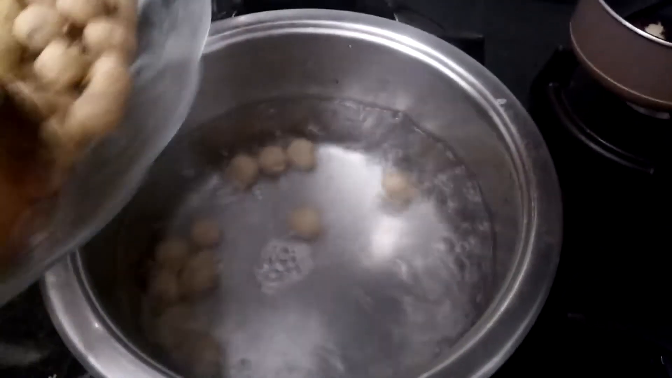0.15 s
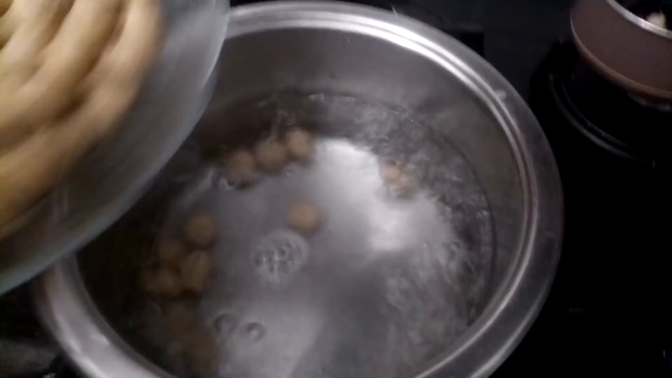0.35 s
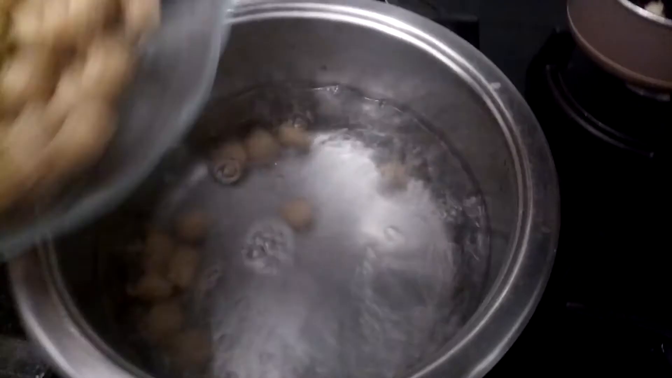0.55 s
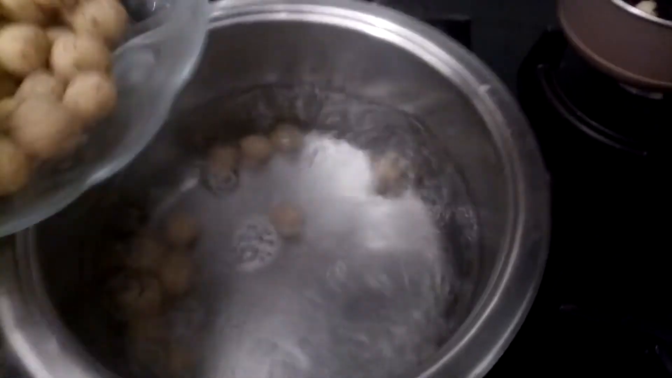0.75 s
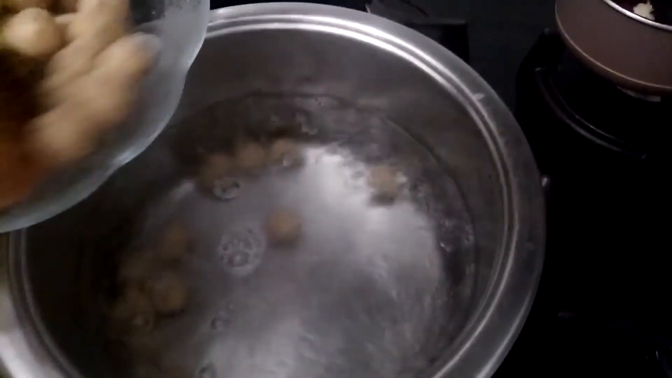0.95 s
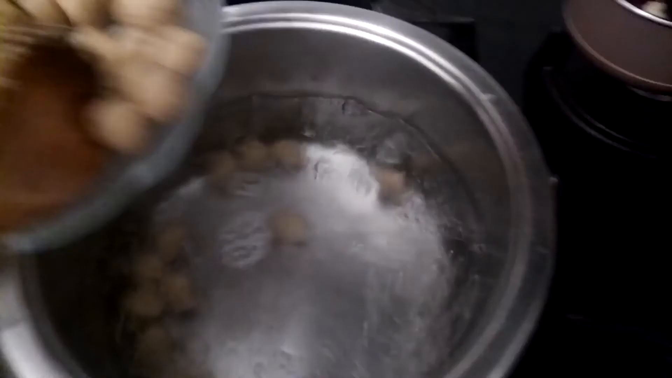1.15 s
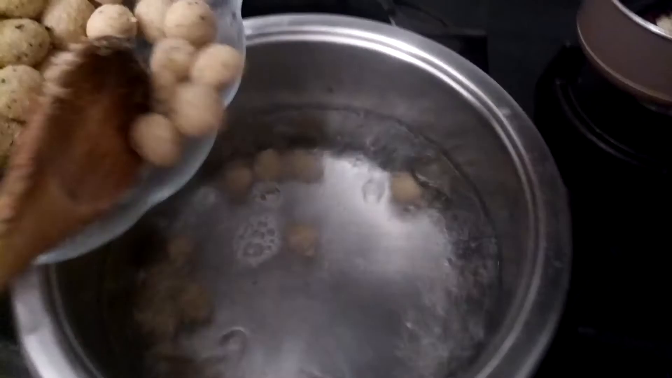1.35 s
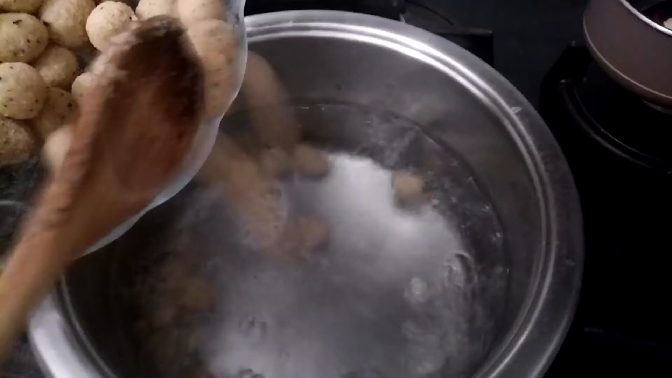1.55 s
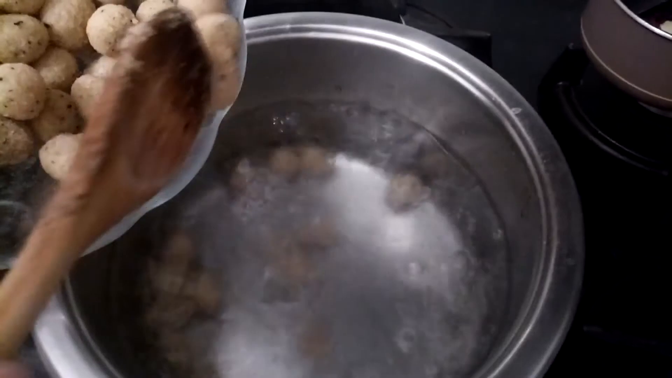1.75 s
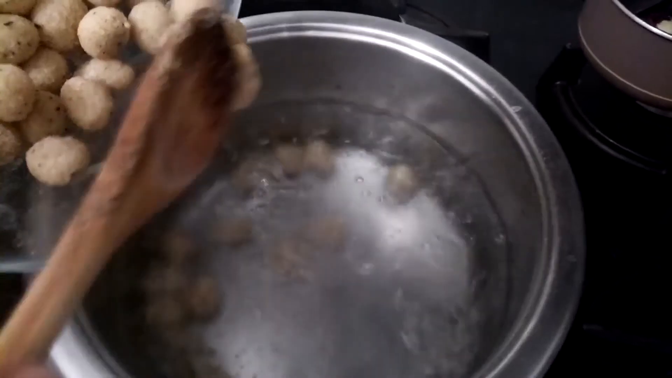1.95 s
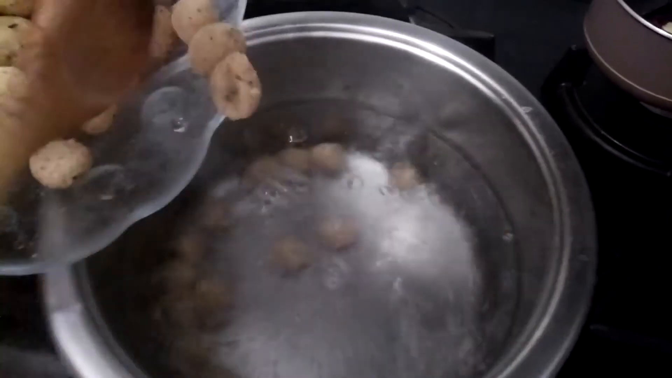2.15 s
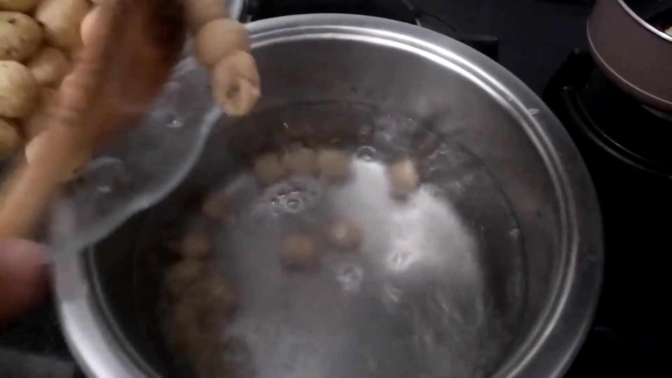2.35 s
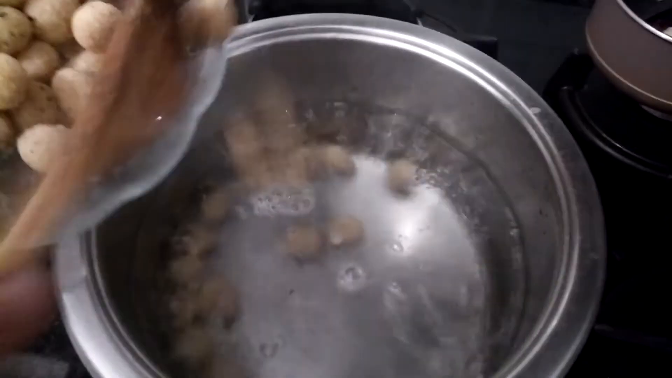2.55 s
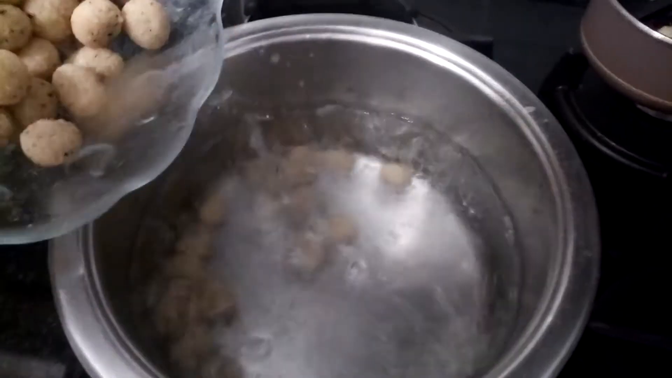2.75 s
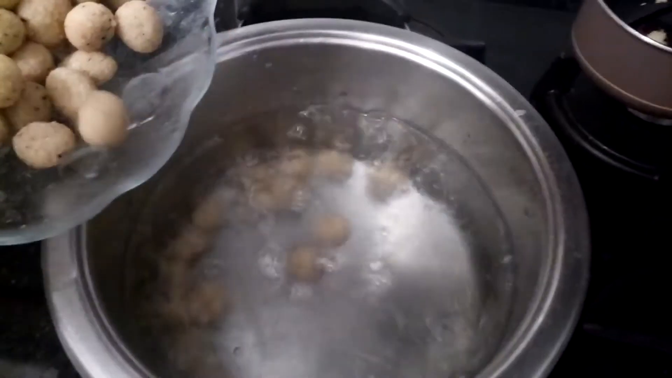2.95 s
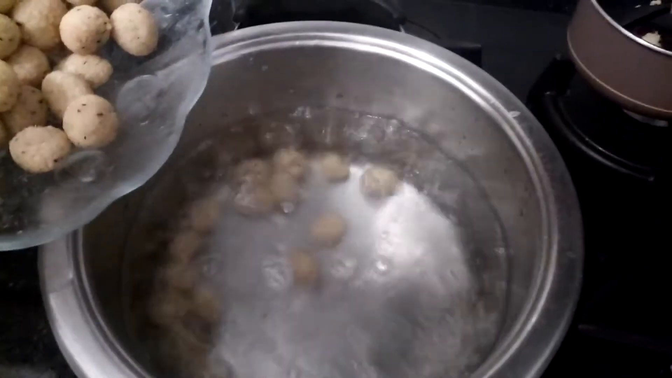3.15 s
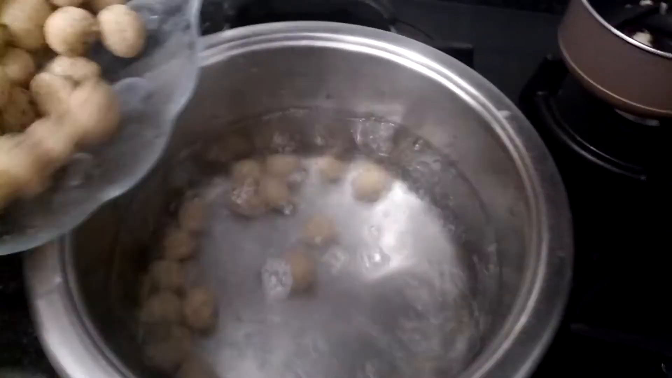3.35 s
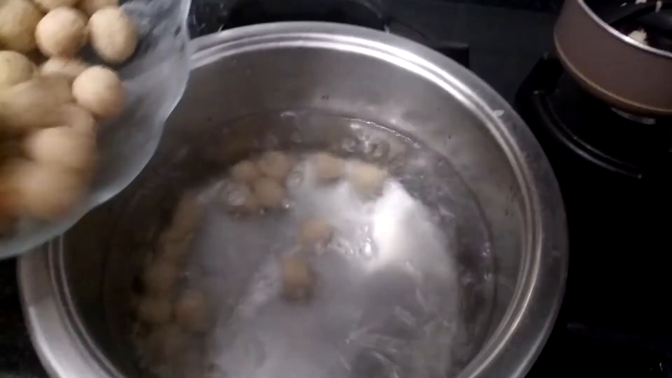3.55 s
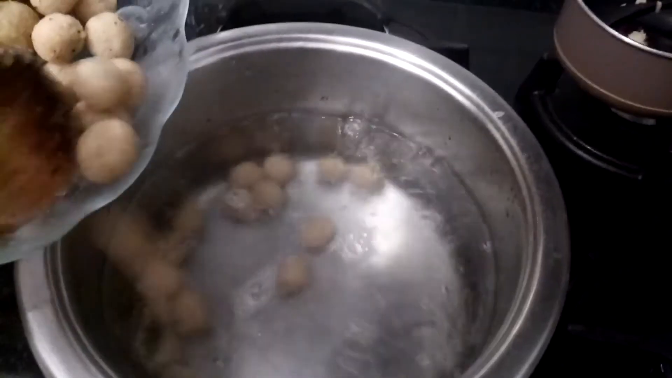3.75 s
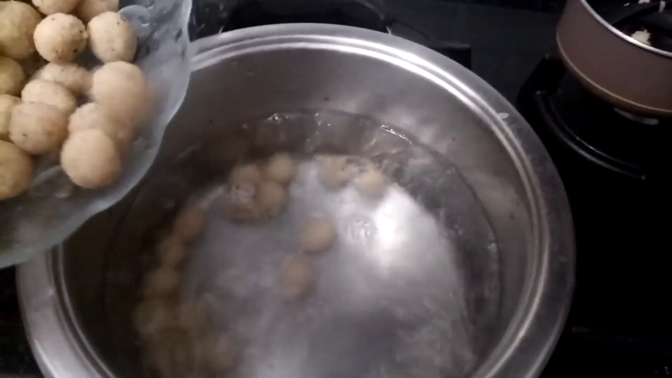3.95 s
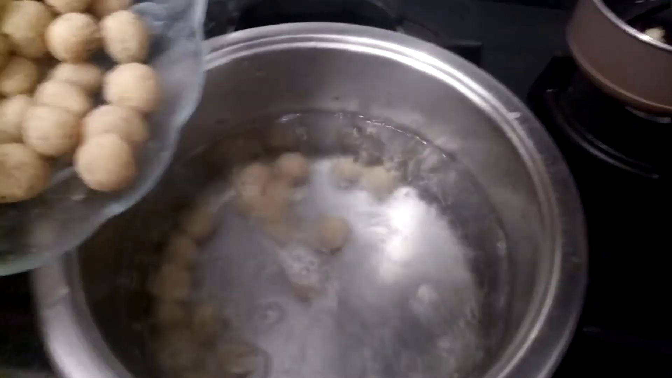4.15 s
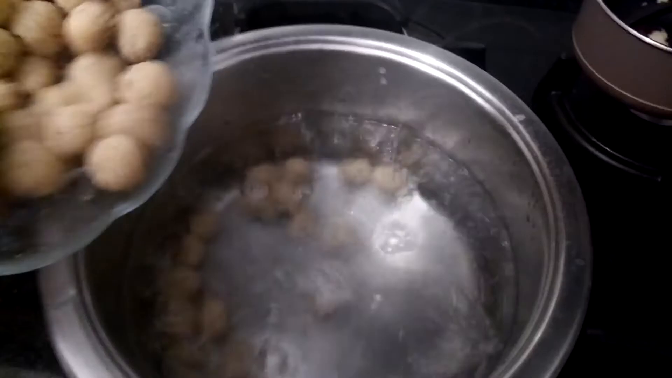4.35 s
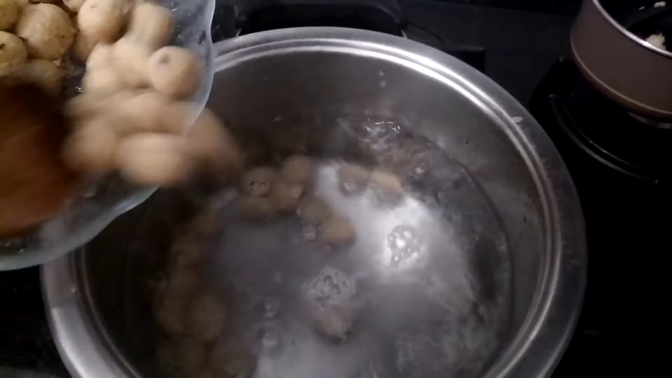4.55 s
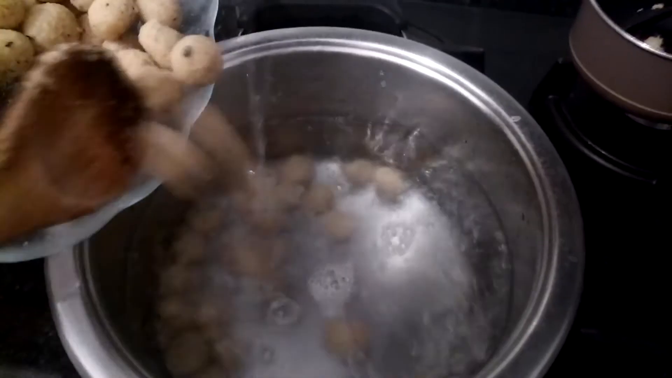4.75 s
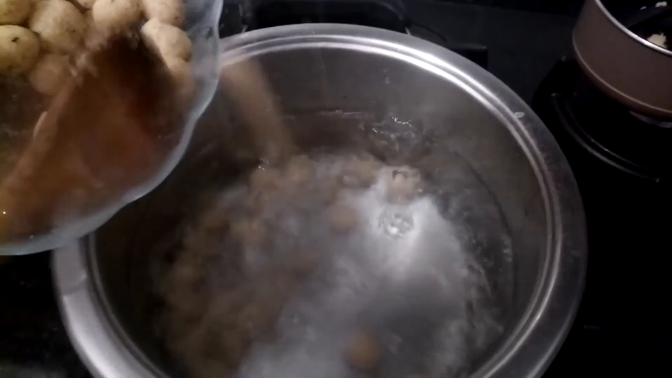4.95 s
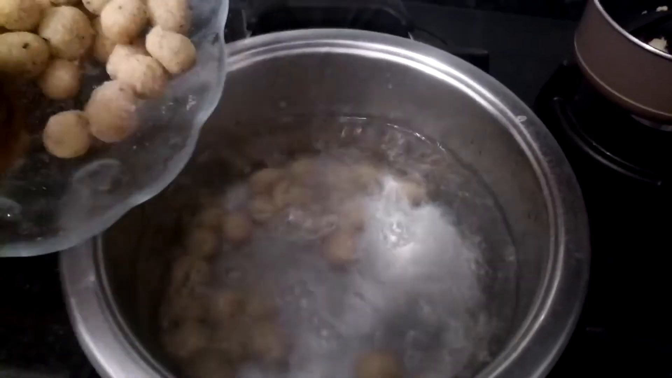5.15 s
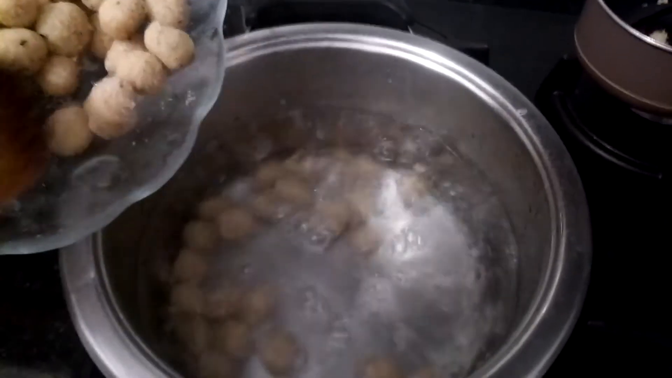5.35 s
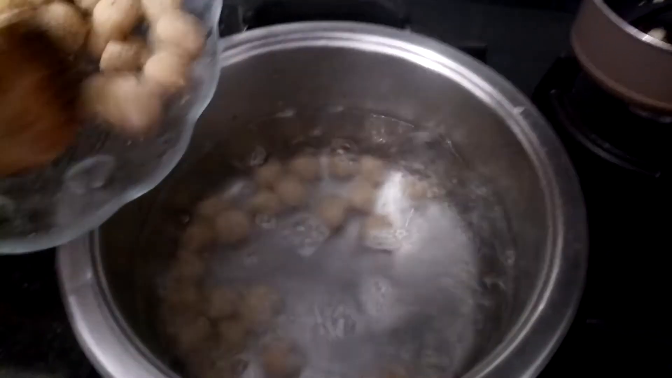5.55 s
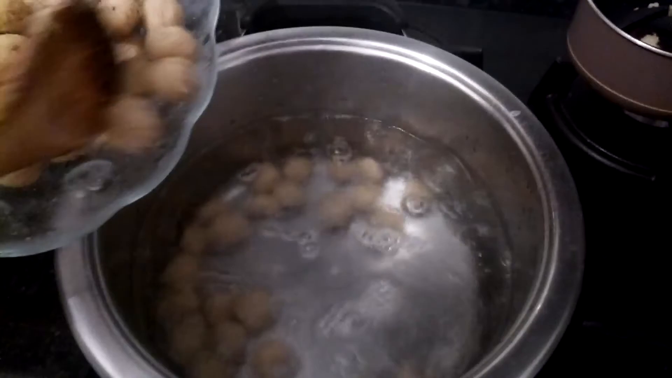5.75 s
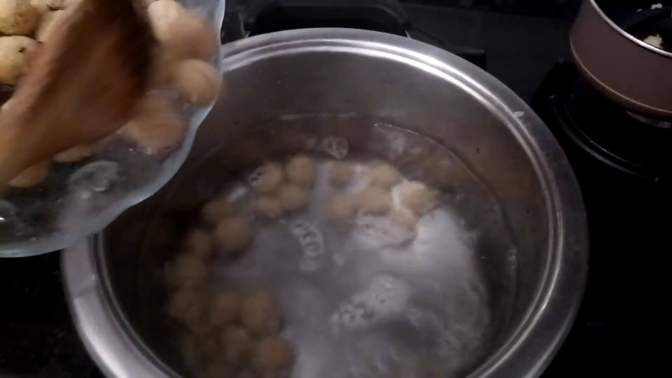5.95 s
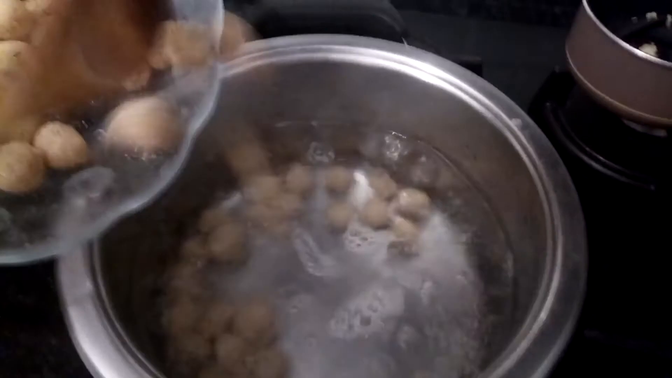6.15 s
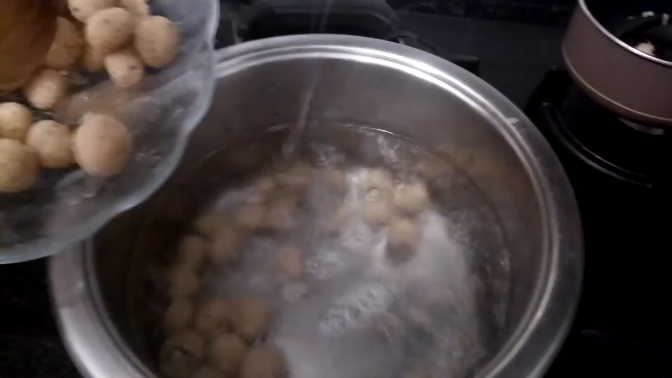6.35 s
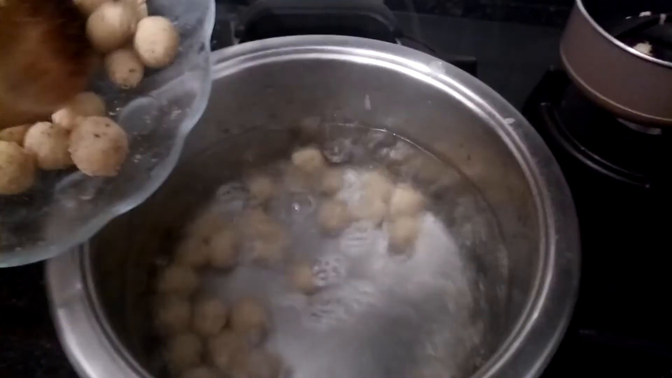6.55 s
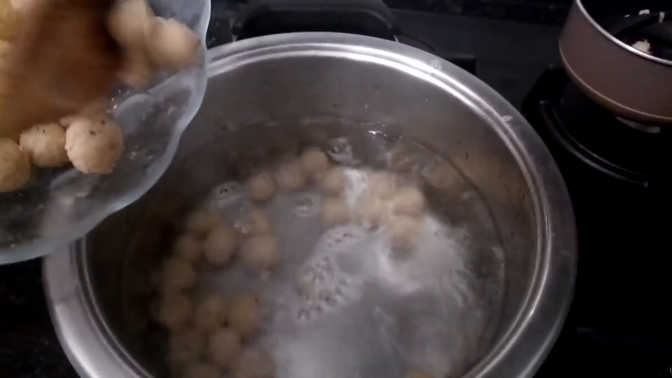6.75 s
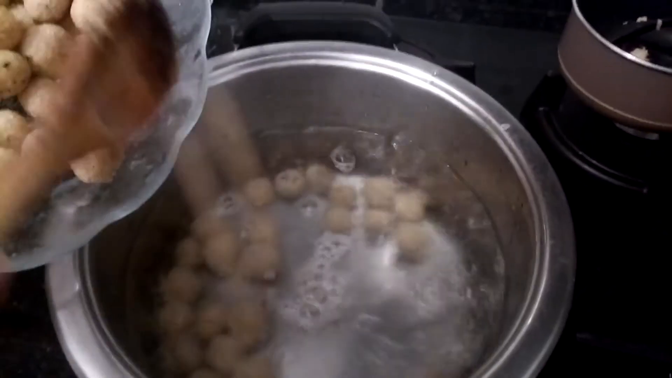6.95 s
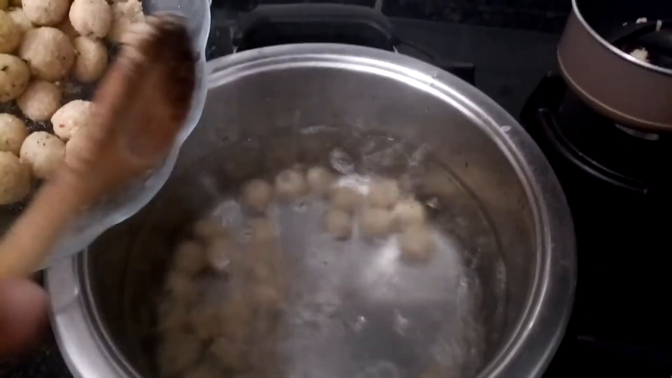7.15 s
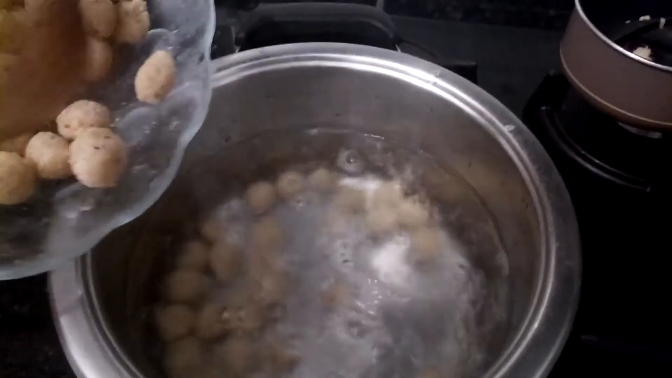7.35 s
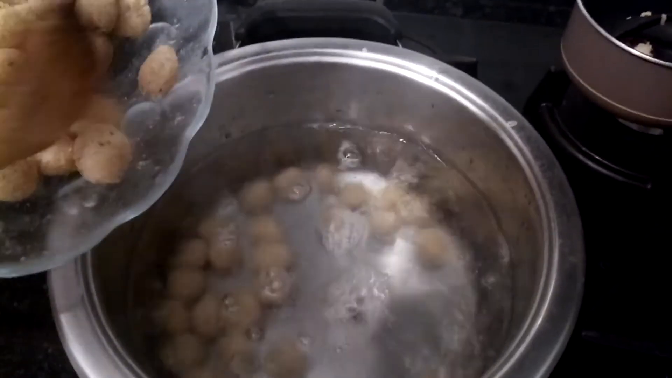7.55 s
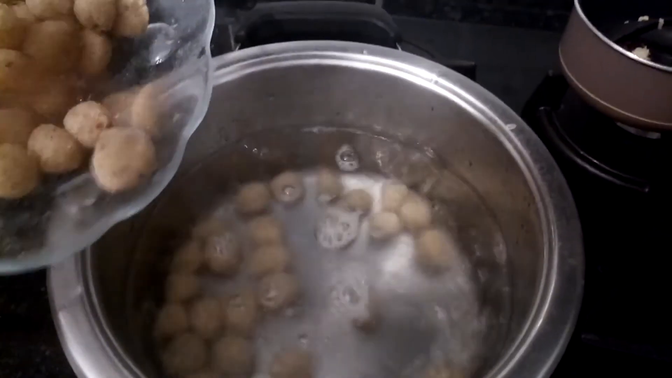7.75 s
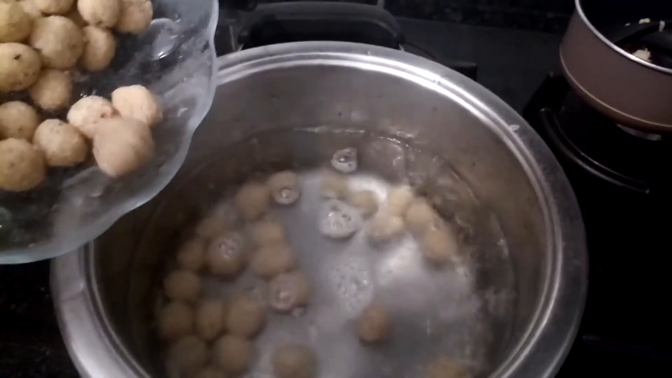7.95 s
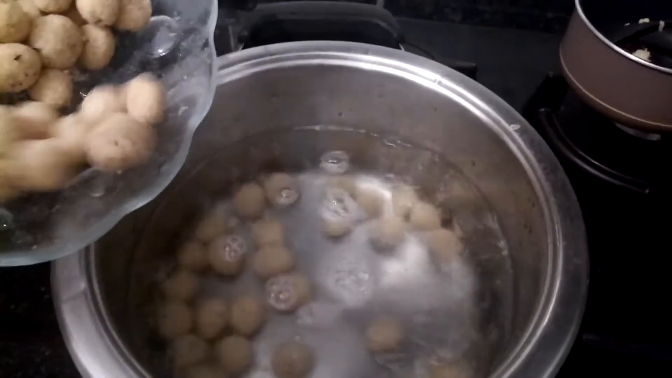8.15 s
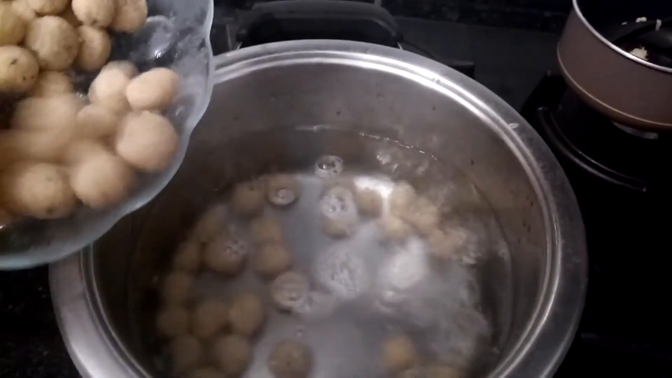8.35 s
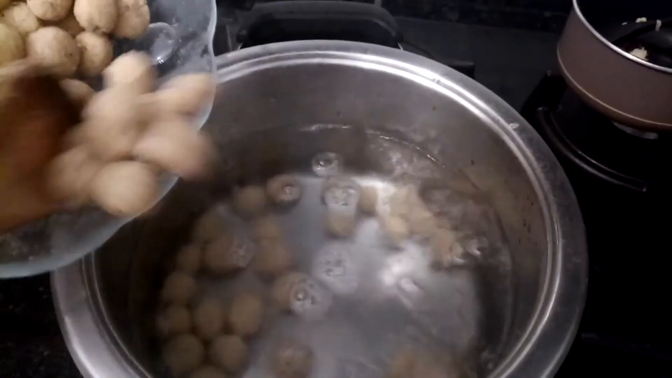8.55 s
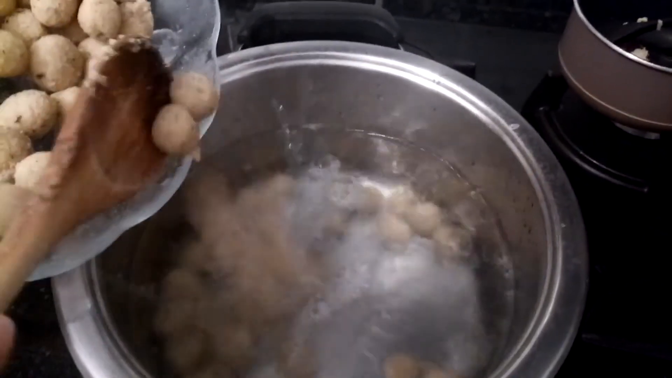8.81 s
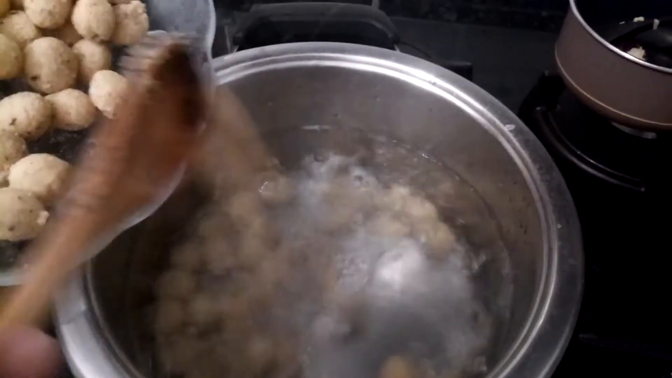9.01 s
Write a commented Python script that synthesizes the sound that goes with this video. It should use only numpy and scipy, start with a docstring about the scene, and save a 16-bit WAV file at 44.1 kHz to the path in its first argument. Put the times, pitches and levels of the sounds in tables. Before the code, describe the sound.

Water boils with a steady hiss while a wooden spoon taps a glass bowl and small balls plop and splash in.

```python
"""Kitchen: small meatballs are pushed off a glass bowl with a wooden spoon into a boiling steel pot.
Balls pat the water and plunge with a slap, a short cavity plop and fine spray; bubbles and the air
in the pot ring. The spoon knocks on the bowl three times, ringing glass and wood; the second knock
also thuds. Collapsing steam bubbles make the pot hiss. Air rumbles faintly on a near microphone
over a low hum; the room adds a short tail."""
import sys
import numpy as np
from scipy import signal
from scipy.fft import rfft, irfft
from scipy.io import wavfile
from scipy.ndimage import uniform_filter1d

SR = 44100
rng = np.random.default_rng(int(sys.argv[2]) if len(sys.argv) > 2 else 0)


def dump_mix(stems):
    """Bounce the given channels to the path in sys.argv[1] as a 16-bit WAV at rate SR."""
    frames = np.atleast_2d(stems).T  # one column per channel
    limited = np.clip(frames, -1, 1)  # hard clip at full scale
    pcm = np.round(limited * 32767).astype(np.int16)
    wavfile.write(sys.argv[1], SR, pcm)


N = 398223
TIME = np.arange(N) / SR

# balls entering the water: start_s, plop_db, cavity_hz, slap_db, slap_hz, spray_db, entry_s
PLUNGES = [(1.5184, -45, 945, -38.5, 5840, -36.5, .004), (1.5556, -46.5, 930, -46.5, 4700, -42, 0.0026),
           (2.5096, -39, 1140, -36, 5100, -36, 0.0023), (3.7253, -44, 1070, -44.5, 5000, -47, .0028),
           (4.0811, -55, 925, -46, 5340, -46.5, .0012), (4.5838, -43.5, 910, -36.5, 4900, -51, 0.0014),
           (4.6602, -46.5, 523, -40, 4900, -39, 0.0056), (4.7518, -47, 1220, -47.5, 3850, -43, 0.0062),
           (4.8121, -44.5, 775, -38, 5270, -48, 0.0083), (4.9567, -45.5, 895, -36, 4230, -39.5, 0.00091),
           (6.0995, -44, 905, -40.5, 4730, -39.5, 0.00089), (6.949, -42, 865, -48, 3850, -54, 0.0011),
           (6.952, -50.5, 1100, -34, 4670, -50, 0.0023), (8.7712, -72, 1300, -42.5, 3900, -57, 0.0013),
           (8.7773, -46, 980, -32, 4550, -40, .0014)]
# broad spectrum of the boil: freq_hz, relative_db
BOIL_COLOUR = [(200, -10.5), (560, -9), (780, -17), (1200, -4), (1650, -10.5), (2400, -21.5), (3000, -15),
               (3600, -10.5), (5300, -4.5), (6000, -13), (7300, -14.5), (8100, -34), (11600, -33),
               (14000, -35), (14800, -4.5), (15800, -8)]


def impact(plop_db, cavity_hz, slap_db, slap_hz, spray_db, entry_s, size=4096):
    """A ball slaps the surface, opens a short-lived air cavity and throws fine spray."""
    # spectra of plop (shaped by the air in the pot), slap and spray: freq_hz, relative_db
    plop_colour = [(150, -19.5), (330, -10), (490, 6.5), (600, 1), (710, -0.5), (880, 4.5), (1450, -0.5),
                   (2200, -2), (4000, 2), (9000, -48)]
    slap_colour = [(1200, -9), (2400, -3.5), (3100, -5.5), (3700, 2), (4150, -5.5), (4600, 2), (5300, 0.5),
                   (6000, -0.5), (6900, -4.5), (7600, -14), (8400, -20), (11000, -14), (14000, -23)]
    spray_colour = [(1000, -24), (5000, -28), (7500, -19), (9000, -21.5), (10200, -18), (11500, -20),
                    (13800, -12), (15000, 1.5), (15800, 1), (16400, -12.5)]
    hz = np.fft.rfftfreq(size, 1 / SR)
    plop = burst(resonance(hz, cavity_hz, q=1.72) * amp(read(plop_colour, hz)), entry_s, grit=0.26)
    slap = burst(resonance(hz, slap_hz, q=1.06) ** 2 * amp(read(slap_colour, hz)), entry_s, grit=1.03)
    contrast = (entry_s / 0.003) ** 0.39  # quick entry: broad crack; slow entry: only the finest fizz
    spray = burst(amp(read(spray_colour, hz) * contrast), 2.4 * entry_s, grit=3.0)
    return amp(plop_db) * plop + amp(slap_db) * slap + amp(spray_db) * spray


def splashes():
    """Full plunges, plus light pats that open hardly any cavity."""
    # a ball or drop touches the surface: start_s, slap_db, spray_db
    pats = [(1.4617, -54.5, -45), (2.441, -45, -40.5), (4.5243, -56, -48), (4.777, -52, -54),
            (4.8634, -51, -67), (4.9, -56, -51), (6.15, -55, -51), (6.204, -53.5, -48.5), (8.598, -58, -50),
            (8.615, -53, -50), (8.658, -52, -48), (8.671, -45.5, -42), (8.7262, -43.5, -38),
            (8.8195, -55, -37.5), (9.0064, -53, -46.5)]
    out = np.zeros(N)
    for start_s, *plunge in PLUNGES:
        add(out, start_s, impact(*plunge))
    for start_s, slap_db, spray_db in pats:
        pat = impact(plop_db=spray_db - 21, cavity_hz=1300, slap_db=slap_db, slap_hz=4630,
                     spray_db=spray_db, entry_s=0.0029)
        add(out, start_s, pat)
    return out


def plunge_rings(rise_per_s=0.17, attack_s=0.00054):
    """Trapped bubbles and, near 480 Hz, the air in the pot ring as damped, slightly rising sines."""
    # rings after plunges: start_s, level_db, pitch_hz
    rings = [(1.5556, -40.5, 530), (3.729, -52.5, 245), (4.0818, -29.5, 3670), (4.0818, -29.5, 5940),
             (4.0827, -25.5, 7480), (4.5841, -34, 840), (4.6604, -39, 465), (4.664, -49, 260),
             (4.6625, -34.5, 2880), (4.751, -37, 1173), (4.7542, -37.5, 1403), (4.8126, -32.5, 840),
             (4.8142, -37, 502), (4.957, -43.5, 465), (6.1, -40.5, 806), (6.9655, -30, 5500),
             (6.98, -32, 4900), (6.995, -29, 5150)]
    t, out = np.arange(SR // 5) / SR, np.zeros(N)
    for start_s, level_db, pitch_hz in rings:
        t60_s = 0.03 * (pitch_hz / 1000) ** -0.6  # higher rings die sooner
        envelope = (1 - np.exp(-t / attack_s)) * decay(t, t60_s)
        tone = np.sin(2 * np.pi * pitch_hz * t * (1 + rise_per_s * t))
        add(out, start_s, amp(level_db) * envelope * tone)
    return out


def spoon_knocks(crack_db=-16, size=4096):
    """Each blow cracks and rings glass and wood; where it lands decides which modes speak most."""
    # spoon on bowl: start_s, glass_db, wood_db, driven_hz, contact_q
    blows = [(0.4638, -30, -42.5, 1340, 0.65), (1.0807, -48, -34.5, 1400, 0.42),
             (2.8896, -33.5, -54, 1840, 1.76)]
    # modes of the glass bowl and the wooden spoon: pitch_hz, relative_db, t60_s
    bowl_modes = [(534, -14.5, 0.13), (1082, -4, 0.08), (1540, 0.5, 0.016), (1803, -0.5, 0.062),
                  (1956, -23, 0.16), (2510, -18, 0.16), (3120, -8, 0.036), (3485, 0.5, 0.05),
                  (4580, -6, 0.037), (5710, 0, 0.047), (5720, -11, 0.12)]
    spoon_modes = [(205, -5.5, 0.068), (820, 3.5, 0.02), (880, 0.5, 0.031), (1120, -5.5, 0.034),
                   (1624, -1, 0.048), (1646, -3, 0.049), (2410, -9, 0.042), (2620, -9, .08),
                   (2694, -4.5, 0.069), (3580, -15, 0.065)]
    t, out = np.arange(SR // 2) / SR, np.zeros(N)
    hz = np.fft.rfftfreq(size, 1 / SR)
    for start_s, glass_db, wood_db, driven_hz, contact_q in blows:
        for modes, blow_db in ((bowl_modes, glass_db), (spoon_modes, wood_db)):
            for k, (pitch_hz, mode_db, t60_s) in enumerate(modes):
                gain = (-1) ** k * resonance(pitch_hz, driven_hz, contact_q) * amp(blow_db + mode_db)
                add(out, start_s, gain * decay(t, t60_s) * np.sin(2 * np.pi * pitch_hz * t))
        crack = burst(resonance(hz, driven_hz, q=0.9) ** 2, decay_s=0.01, grit=0.87)
        add(out, start_s, amp(max(glass_db, wood_db) + crack_db) * crack)
    return out


def boil(body_db=-55.5, pops_per_s=700, pop_spread_db=5.0, pop_share=0.15, fizz_above_hz=9000):
    """Countless collapsing bubbles, a few of them larger, ring the pot."""
    # pot resonances and the microphone's bright peak near 15 kHz: centre_hz, width_hz, relative_db
    hiss_peaks = [(498, 31, -5), (1299, 21, 1.5), (1346, 15.4, 3), (1449, 55, 2), (1560, 35, 2),
                  (1920, 710, -8), (2606, 74, -9.5), (3503, 275, -4.5), (4120, 70, -6), (4373, 46, 2),
                  (5020, 74, -2.5), (5492, 89, 1.5), (6880, 330, -12.5), (8520, 79, -23.5),
                  (10150, 195, -17.5), (10680, 130, -23), (12600, 70, -26), (12950, 670, -14.5),
                  (15100, 360, -3)]
    hz = np.fft.rfftfreq(N, 1 / SR)
    pops = (rng.random(N) < pops_per_s / SR) * rng.choice([-1, 1], N)
    pop_gain = amp(pop_spread_db * np.minimum(rng.exponential(1, N), 5))
    drive = rfft(rng.standard_normal(N) + pop_share * unit(pops * pop_gain))
    power = amp(read(BOIL_COLOUR, hz)) ** 2
    for centre_hz, width_hz, peak_db in hiss_peaks:
        power += (amp(peak_db) / (1 + ((hz - centre_hz) / (0.68 * width_hz)) ** 2)) ** 2
    ripple_db = 1.9 / (1 + hz / 7000) * wander(len(hz), 150)  # weak wall modes, merging in the treble
    bass_cut = hz ** 2 / (hz ** 2 + 120 ** 2)  # small bubbles radiate little bass
    spectrum = drive * np.sqrt(power) * amp(ripple_db) * bass_cut
    fine = hz > fizz_above_hz
    body = unit(irfft(spectrum * ~fine, N)) * amp(body_db + 0.24 * wander(N, 2500))
    fizz = unit(irfft(spectrum * fine, N)) * fizz_gain() * amp(0.9 * wander(N, 1600))
    return body + fizz


def fizz_gain(start_db=-57, cooling_db_per_s=0.5, stir_db=-60):
    """The fizz thins as the water cools and flares up at every plunge."""
    base_power = amp(start_db - cooling_db_per_s * TIME) ** 2
    stir_power = sum(surge(start_s, rise_s=0.035, fade_s=0.36) ** 2 for start_s, *_ in PLUNGES)
    return np.sqrt(base_power + amp(stir_db) ** 2 * stir_power)


def simmer(pitches=24, blips_per_s=140, level_db=-72):
    """Steam bubbles burst all over the surface as tiny rising blips."""
    out = np.zeros(N)
    for pitch_hz in np.geomspace(950, 2100, pitches):
        cycles = np.arange(2000) * pitch_hz / SR
        envelope = np.exp(-cycles / 6) * (1 - np.exp(-cycles))
        blip = envelope * np.sin(2 * np.pi * cycles * (1 + 0.0049 * cycles))
        starts_s = rng.uniform(0, N / SR, round(blips_per_s * N / SR / pitches))
        for start_s, strength in zip(starts_s, rng.exponential(1, 200)):
            add(out, start_s, amp(1.5 * min(strength, 3) + read(BOIL_COLOUR, pitch_hz)) * blip)
    return amp(level_db) * unit(out)


def pot_singing():
    """Bubbles briefly favour one resonance of the pot."""
    # faint spells of narrow noise: start_s, end_s, pitch_hz, width_hz, level_db
    spells = [(0.2, 1.35, 5000, 60, -65.5), (1.8, 2.05, 5040, 74, -67), (5.46, 5.726, 1595, 60, -61)]
    hz, out = np.fft.rfftfreq(N, 1 / SR), np.zeros(N)
    for start_s, end_s, pitch_hz, width_hz, level_db in spells:
        progress = np.clip((TIME - start_s) / (end_s - start_s), 0, 1)
        swell = np.sqrt(np.sin(np.pi * progress).clip(0))
        band = 1 / (1 + ((hz - pitch_hz) / (0.5 * width_hz)) ** 2)
        out += amp(level_db) * swell * noise(band)
    return out


def churn(x, patch_db=1.0, mode_db=1.02):
    """Rolling water shifts which resonances are strong: in narrow slow patches and broad quick ones."""
    spectra = signal.stft(x, nperseg=1024, noverlap=768)[2]
    shift_db = np.zeros(spectra.shape)
    for depth_db, bins, frames in ((patch_db, 5, 36), (mode_db, 26, 3)):
        field = uniform_filter1d(rng.standard_normal(spectra.shape), bins, axis=0)
        shift_db += depth_db * unit(uniform_filter1d(field, frames, axis=1))
    return signal.istft(spectra * amp(shift_db), nperseg=1024, noverlap=768)[1][:N]


def rumble_and_hum(draught_db=-84.5, hum_hz=123, hum_db=-83):
    """Low rumble of air on the microphone and one spoon thud, over a faint, wavering hum."""
    # spectrum of the rumble: freq_hz, relative_db
    rumble_colour = [(15, -40), (30, -5), (45, -3), (90, 0.5), (130, -1), (180, -15.5), (300, -6),
                     (700, -75)]
    # puffs of air and, at 1.11 s, the thud of the second spoon knock: peak_s, level_db, fade_s
    low_swells = [(.69, -70, 0.043), (1.11, -67, 0.16), (1.55, -59.5, .25), (2.23, -67.5, .05),
                  (4.1, -71, 0.19), (4.85, -72, 0.33), (5.52, -60.5, 0.12), (6.25, -70, 0.087),
                  (8.87, -73, .12)]
    rumble = noise(amp(read(rumble_colour, np.fft.rfftfreq(N, 1 / SR))))
    hum = np.sqrt(2) * np.sin(2 * np.pi * np.cumsum(hum_hz + 2.61 * wander(N, 4086)) / SR)
    power = amp(draught_db + 3 * wander(N, 5040)) ** 2
    for peak_s, level_db, fade_s in low_swells:
        power += (amp(level_db) * surge(peak_s, rise_s=0.053, fade_s=fade_s)) ** 2
    return rumble * np.sqrt(power) + amp(hum_db + 2.5 * wander(N, 6000)) * hum


def echoes(x, t60_table, delay_s):
    """Dense reflections that die at their own rate in each band."""
    hz, t, spectra = signal.stft(rng.standard_normal(SR // 2), SR, nperseg=128)
    tail = signal.istft(spectra * decay(t, read(t60_table, hz)[:, None]), SR, nperseg=128)[1]
    tail = np.concatenate([np.zeros(round(delay_s * SR)), tail])
    return signal.fftconvolve(x, tail / np.linalg.norm(tail))[:N]


def burst(gain, decay_s, grit, size=4096):
    """A sharp contact and a dying scatter, coloured by gain; energy of 10 ms at rms 1."""
    t = np.arange(size) / SR
    scatter = rng.standard_normal(size) * np.exp(-t / decay_s) * (1 - np.exp(-t / 0.00024))
    drive = grit * scatter / np.linalg.norm(scatter)
    drive[0] += 1
    sound = irfft(rfft(drive) * minimum_phase(gain))
    return sound / np.linalg.norm(sound) * np.sqrt(SR / 100)


def minimum_phase(gain):
    """Spectrum of the tightest causal response with this gain."""
    log_gain = np.log(np.maximum(gain, 1e-5))
    mirrored = np.concatenate([log_gain, log_gain[-2:0:-1]])
    return np.exp(np.conj(signal.hilbert(mirrored)))[:len(gain)]


def resonance(hz, centre_hz, q):
    """Gain of a single resonance."""
    ratio = (hz + 1) / centre_hz
    return 1 / np.sqrt(1 + (q * (ratio - 1 / ratio)) ** 2)


def noise(gain):
    """Noise of rms 1, coloured by gain."""
    return unit(irfft(rfft(rng.standard_normal(N)) * gain, N))


def wander(size, span):
    """Random curve of rms 1 that changes over span points."""
    knots = rng.standard_normal(size)
    return unit(np.interp(np.arange(size) / span, np.arange(size), knots))


def surge(peak_s, rise_s, fade_s):
    """Gain that climbs to 1 at peak_s, then dies away."""
    return np.exp(np.minimum((TIME - peak_s) / rise_s, (peak_s - TIME) / fade_s))


def decay(t, t60_s):
    """Gain that falls 60 dB in t60_s."""
    return np.exp(-np.log(1000) * t / t60_s)


def amp(db):
    """Decibels to gain."""
    return 10 ** (np.asarray(db) / 20)


def unit(x):
    """Scales to rms 1."""
    return x / np.sqrt(np.mean(abs(x) ** 2) + 1e-20)


def read(table, hz):
    """Interpolates a table on a log-frequency axis."""
    freq_hz, value = np.transpose(table)
    return np.interp(np.log(hz + 1), np.log(freq_hz + 1), value)


def add(mix, start_s, sound):
    """Mixes a sound in at start_s."""
    part = mix[round(start_s * SR):][:len(sound)]
    part += sound[:len(part)]


def scene(wall_db=-9, room_db=-6):
    """Splashes bounce between the pot walls; they and the knocks echo in the kitchen, over the boil."""
    # reverberation of kitchen and pot: freq_hz, t60_s
    kitchen_decay = [(200, 1), (1000, 0.37), (5000, 0.3), (15000, 0.37)]
    pot_decay = [(500, 0.026), (15000, 0.014)]
    water = splashes() + plunge_rings()
    knocks = spoon_knocks()
    water += amp(wall_db) * echoes(water, pot_decay, delay_s=0.001514)
    room = amp(room_db) * echoes(water + knocks, kitchen_decay, delay_s=0.006)
    mono = water + knocks + room + churn(boil() + simmer() + pot_singing()) + rumble_and_hum()
    return np.array([mono, mono])


def record(dry, cutoff_hz=15820):
    """Steep low-pass on both channels."""
    lowpass = signal.firwin(711, cutoff_hz, window=("kaiser", 9), fs=SR)
    return signal.oaconvolve(dry, lowpass[None], "same")


dry = scene()
out = record(dry)
dump_mix(out)
```